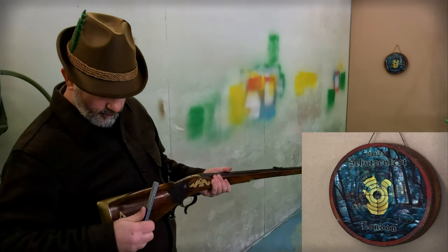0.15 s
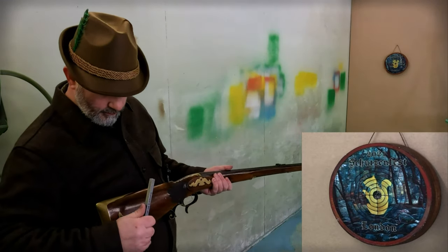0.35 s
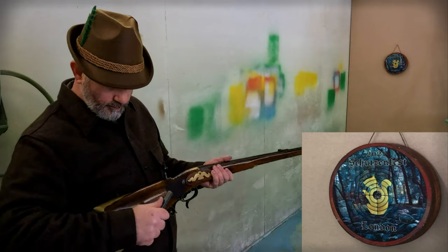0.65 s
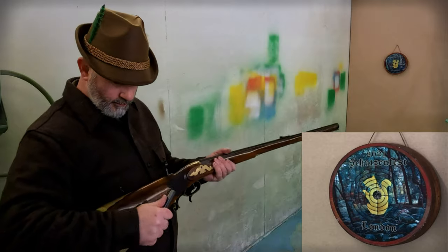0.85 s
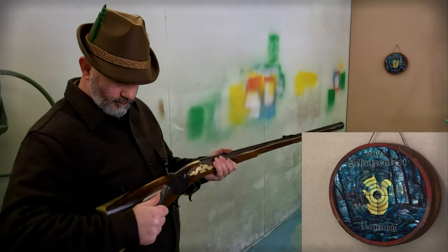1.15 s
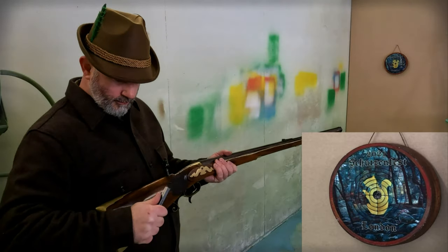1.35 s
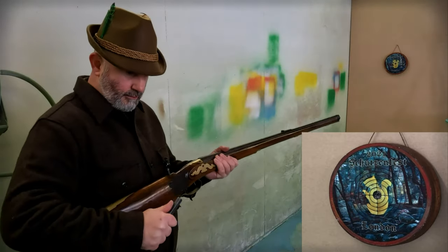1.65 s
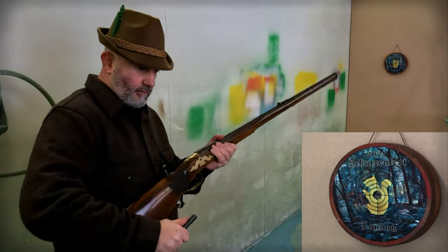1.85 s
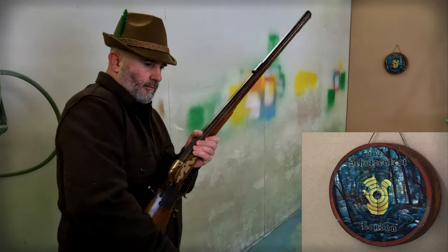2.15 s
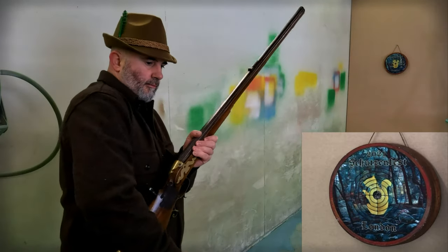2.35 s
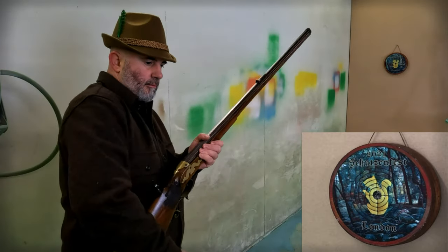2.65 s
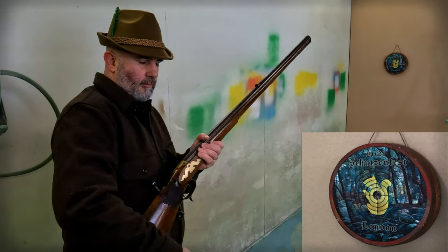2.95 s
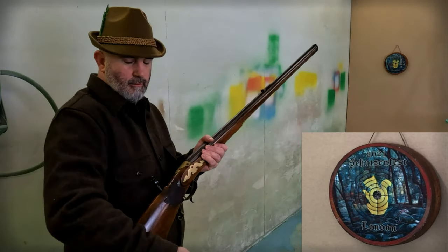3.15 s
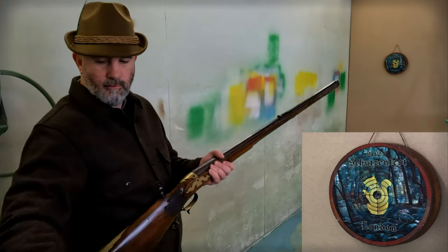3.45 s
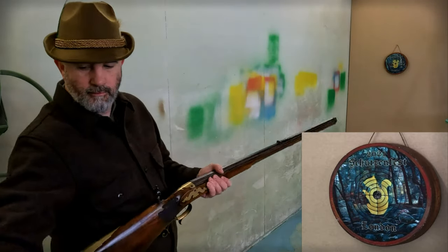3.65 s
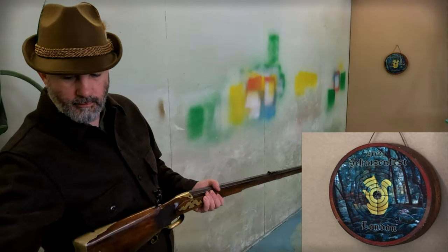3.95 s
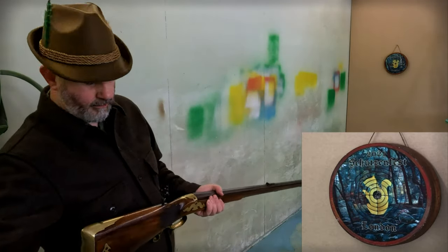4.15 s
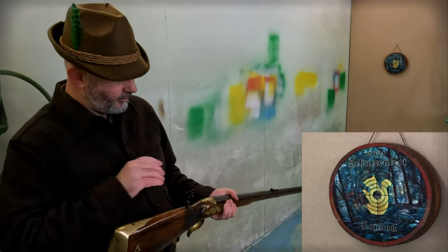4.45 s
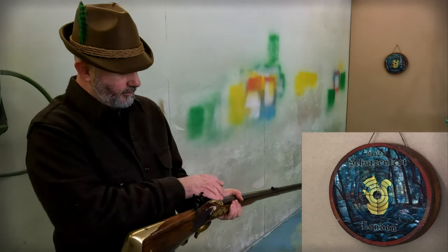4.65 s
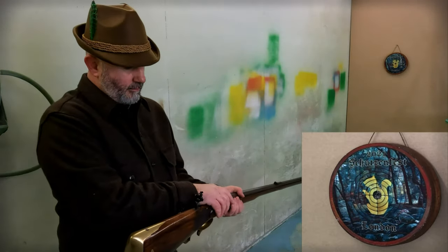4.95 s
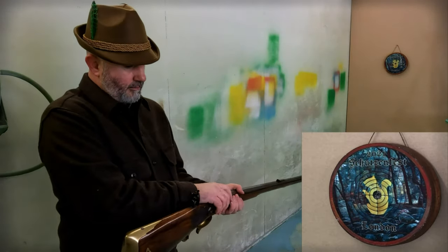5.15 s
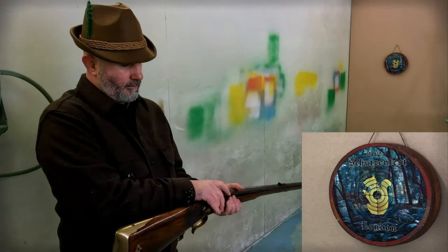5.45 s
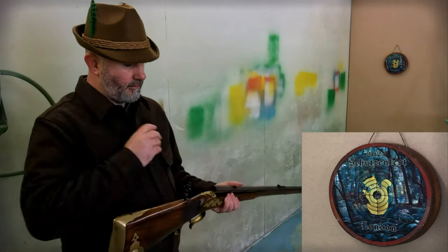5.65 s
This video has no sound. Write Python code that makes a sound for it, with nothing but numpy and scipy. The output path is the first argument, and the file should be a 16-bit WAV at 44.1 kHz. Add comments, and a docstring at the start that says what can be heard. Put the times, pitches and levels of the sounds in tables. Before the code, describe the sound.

Metallic clacks and a sharp catch snap in a bare echoing room, then steel thuds and bounces on wood over faint traffic.

```python
"""In a bare, echoing room an old air rifle is cocked with a steel crank: the crank scrapes in and taps
the action, a catch snaps, and the crank is dropped on a wooden table, where it bounces, rattles and rings.
Far traffic rumbles and drones; sleeves rustle over faint room tone. Blows are sums of decaying
modes with a stereo noise tail for the room; scrapes, rustle and room tone are shaped noise; the traffic
is shaped noise and wandering sines. The camera's noise suppressor dims the quiet moments."""
import sys
import numpy as np
from scipy import signal
from scipy.fft import rfft, irfft, next_fast_len
from scipy.io import wavfile
from scipy.ndimage import uniform_filter1d, map_coordinates

SR = 44100
rng = np.random.default_rng(int(sys.argv[2]) if len(sys.argv) > 2 else 0)


def ratio_of_db(decibels):
    """Turn decibels (scalar or array-like) into linear amplitude factors; 0 dB maps to 1."""
    return 10 ** (np.asarray(decibels, float) / 20)


def inscribe(sig):
    """Save sig as 16-bit PCM at rate SR to the path in sys.argv[1].

    A 1-D sig is mono; a 2-D sig holds one channel per row.
    Samples are clipped to [-1, 1] before scaling.
    """
    pcm = np.round(np.clip(np.atleast_2d(sig).T, -1, 1) * 32767)
    wavfile.write(sys.argv[1], SR, pcm.astype(np.int16))


N = 255330  # length in samples


def unit(x):
    """Scaled to rms 1."""
    return x / np.sqrt(np.mean(x ** 2) + 1e-20)


def along(points, hz):
    """Reads (Hz, value) points on a log frequency axis."""
    f, v = np.transpose(points)
    return np.interp(np.log(hz + 1), np.log(f + 1), v)


def curves(rows):
    """One value per sample for each column after the time."""
    s, *columns = np.transpose(rows)
    return [np.interp(np.arange(N) / SR, s, column) for column in columns]


def wobble(rate):
    """A smooth random curve with rate knots a second."""
    knots = rng.standard_normal(int(N * rate / SR) + 4)
    return map_coordinates(knots, [np.arange(N) * rate / SR])


def paired(z, hz, alike):
    """Mixes two unrelated spectra into a left and right of the given likeness."""
    turn = np.arccos(np.clip(along(alike, hz), -1, 1)) / 2
    mid, side = z[0] * np.cos(turn), z[1] * np.sin(turn)
    return np.array([mid + side, mid - side])


def noise(tone, alike):
    """Stereo noise of rms 1 with the given spectrum, falling away steeply beyond both ends of it."""
    size = next_fast_len(N)
    hz = np.fft.rfftfreq(size, 1 / SR)
    below, above = (tone[0][0] * 0.7, -90), (tone[-1][0] * 1.3, -90)
    shape = ratio_of_db(along([below, *tone, above], hz))
    spectra = paired(rfft(rng.standard_normal((2, size))), hz, alike)
    return unit(irfft(spectra * shape, size)[:, :N])


def ring(modes, t, rise_cycles):
    """One blow on a part, peak 1: decaying modes swell together, each at a slightly new strength."""
    hz, db, t60 = np.transpose(modes)[:, :, None]
    strength = db + 2 * rng.standard_normal(hz.shape)
    sign = (-1) ** np.arange(len(hz))[:, None]  # neighbouring modes start in opposite phase
    swell = (1 - np.exp(-t * hz.mean() / rise_cycles)) ** 2  # timed in cycles of the mean frequency
    decay = ratio_of_db(strength - 60 * t / np.abs(t60))
    x = np.sum(sign * decay * np.sin(2 * np.pi * hz * t), axis=0) * swell
    return x / np.abs(x).max()


# How long the bare room echoes. Each row: frequency in Hz, time to fall 60 dB in seconds.
ROOM_DECAY = [(100, 0.43), (300, 0.79), (1000, 1), (2500, 0.94), (5000, 0.58), (8000, 0.49), (13000, 0.21)]
# How alike the echoes reach left and right. Each row: frequency in Hz, likeness from 0 to 1.
ECHO_LIKENESS = [(60, 1), (180, 1), (520, 0.92), (1540, 0.66), (4530, 0.55), (13400, 0.19)]


def add(out, s, blow, pan_db, wet_db):
    """Lays a blow and a fresh room tail from s seconds, each frequency dying at its own speed."""
    hz, t, z = signal.stft(rng.standard_normal((2, SR)), SR, nperseg=256)
    z = paired(z, hz[:, None], ECHO_LIKENESS) * ratio_of_db(-60 * t / along(ROOM_DECAY, hz)[:, None])
    tail = signal.istft(z, SR, nperseg=256)[1][:, :SR]
    age = np.arange(SR) / SR
    # near walls answer strongest, after a short gap
    tail *= np.clip(age / 0.0011, 0, 1) * (1 + 0.99 * np.exp(-age / 0.014))
    tail *= ratio_of_db(wet_db) / np.linalg.norm(tail[0])
    tail[:, 0] = 1  # the direct sound
    balance = ratio_of_db([[pan_db / 2], [-pan_db / 2]])  # positive leans left
    heard = signal.fftconvolve(blow[None], tail, axes=1) * balance
    start = round(s * SR)
    out[:, start:start + heard.shape[1]] += heard


def silence():
    """Stereo silence with spare time at the end for room tails."""
    return np.zeros((2, N + 2 * SR))


# Far rumble. Each row: time in seconds, level in dB before its surges.
RUMBLE_LEVEL = [(0, -64), (.45, -61.5), (.75, -55), (1.05, -60.5), (1.33, -61.5), (1.65, -61.5), (2.1, -60),
                (2.4, -62), (3.3, -67.5), (3.65, -67), (3.8, -63), (4.6, -63.5), (4.9, -74.5), (5.1, -71.5),
                (5.38, -57), (5.48, -71), (5.56, -61.5), (5.79, -50.5)]
# Engine drone. Each row: time in seconds, middle pitch in Hz, middle level in dB.
DRONE_PATH = [(0, 200, -84), (.7, 212, -93), (.88, 218, -72.5), (1.12, 218, -65.5), (1.3, 215, -98.5),
              (1.62, 207, -69), (1.8, 196, -77.5), (2.04, 190.4, -60.5), (2.3, 190, -75.5), (2.7, 187, -78),
              (3.05, 194.9, -73.5), (3.35, 195.4, -73), (3.72, 197.4, -81.5), (3.8, 195, -62),
              (4.6, 205.4, -68), (5.05, 217.1, -67.5), (5.3, 235, -77.5), (5.79, 209.7, -77)]
# Noise bands above and below the drone. Each row: time in seconds, upper level in dB, lower level in dB.
BAND_LEVELS = [(0, -90, -74.5), (.7, -93.5, -101), (1.9, -84, -80.5), (2.3, -74, -70), (2.7, -70, -92.5),
               (3.0, -77, -93), (3.7, -73, -87), (5, -78, -88), (5.3, -67.5, -71.5), (5.6, -69, -74.5),
               (5.79, -69, -62.5)]
# Spectrum of the rumble. Each row: frequency in Hz, relative density in dB per Hz.
RUMBLE_SPECTRUM = [(12, 0), (20, -3), (27, -14), (34, -14), (42, -6), (50, -10), (56, -25)]
# Spectrum of the upper band. Each row: frequency in Hz, relative density in dB per Hz.
UPPER_SPECTRUM = [(240, -11.5), (290, 2), (320, 10.5), (350, -6.5), (400, -16)]
# Spectrum of the lower band. Each row: frequency in Hz, relative density in dB per Hz.
LOWER_SPECTRUM = [(125, -17.5), (145, -2.5), (160, -2), (172, -1), (190, -20)]


def traffic():
    """A rumble with a hum on the room's lowest mode, and an unsteady engine drone between two noise bands."""
    (rumble_db,) = curves(RUMBLE_LEVEL)
    drone_hz, drone_db = curves(DRONE_PATH)
    upper_db, lower_db = curves(BAND_LEVELS)
    near_mono = [(100, 0.98)]

    hum_hz = 39.5 + 1.5 * wobble(4)
    hum = np.sqrt(2) * np.sin(2 * np.pi * np.cumsum(hum_hz) / SR)
    hum = ratio_of_db(-7.5 + 0.65 * wobble(2.1)) * hum
    rumble = ratio_of_db(-0.5) * noise(RUMBLE_SPECTRUM, near_mono) + hum
    surge_db = 0.3 * wobble(3.1)
    rumble = ratio_of_db(rumble_db + surge_db) * rumble

    unsteady_hz = drone_hz + 4 * wobble(25)
    drone = np.sqrt(2) * np.sin(2 * np.pi * np.cumsum(unsteady_hz) / SR)
    drone = ratio_of_db(drone_db + 4 * wobble(25)) * drone

    upper = ratio_of_db(upper_db) * noise(UPPER_SPECTRUM, near_mono)
    lower = ratio_of_db(lower_db) * noise(LOWER_SPECTRUM, near_mono)
    return rumble + drone + upper + lower


# Sleeve and hand strokes. Each row: middle in seconds, length in seconds, rub in dB, hiss in dB.
RUSTLE_STROKES = [(0, 0.13, -67.5, -104), (1.136, .2, -73, -94), (2.002, 0.4, -79, -93.5),
                  (3.72, 0.63, -78, -92.5), (5.321, 0.26, -76.5, -88), (5.622, .15, -81, -87.5),
                  (5.79, 0.19, -70.5, -88)]
# Spectrum of hands on the stock. Each row: frequency in Hz, relative density in dB per Hz.
RUB_SPECTRUM = [(500, -12.5), (800, -16.5), (1100, -10), (1400, -5), (1900, -15.5), (2600, -23),
                (4000, -27)]
# Spectrum of cloth on cloth. Each row: frequency in Hz, relative density in dB per Hz.
HISS_SPECTRUM = [(2500, -44), (4200, -7.5), (5500, -1.5), (7000, -7.5), (8500, -13), (12000, -27.5)]
# Left-right likeness of rustle, room tone and scrape noise. Each row: frequency in Hz, likeness from 0 to 1.
LIKENESS = [(60, 1), (180, 0.86), (520, 1), (1540, 0.27), (4530, 0.14), (13400, 0.12)]


def rustle():
    """Hands rub the stock and cloth brushes cloth; each stroke swells and fades over a faint steady rustle."""
    middle, length, rub_db, hiss_db = np.transpose(RUSTLE_STROKES)[:, :, None]
    swell = np.exp(-(2 * (np.arange(N) / SR - middle) / length) ** 2)
    # the first term of each is the faint rustle between strokes
    rub = ratio_of_db(-81.5) + np.sum(ratio_of_db(rub_db) * swell, axis=0)
    hiss = ratio_of_db(-87) + np.sum(ratio_of_db(hiss_db) * swell, axis=0)
    rub = rub * ratio_of_db(1.5 * wobble(12))
    hiss = hiss * ratio_of_db(0.85 * wobble(6))
    return rub * noise(RUB_SPECTRUM, LIKENESS) + hiss * noise(HISS_SPECTRUM, LIKENESS)


# Spectrum of the room tone. Each row: frequency in Hz, relative density in dB per Hz.
AIR_SPECTRUM = [(36, -36.5), (62, -8), (87, -7), (119, -11.5), (192, -9.5), (387, -16), (623, -22.5),
                (1200, -27), (2830, -36), (4160, -42.5), (6110, -35), (8200, -45), (13800, -46)]


def room_tone():
    """The room at rest: steady shaped noise, widest in the treble."""
    return ratio_of_db(-71.5) * noise(AIR_SPECTRUM, LIKENESS)


# The crank slides on metal up to a contact. Each row: start in seconds, end in seconds,
# level at the start in dB, level at the end in dB, both before the grit.
CRANK_SCRAPES = [(0.096, 0.185, -59, -62.5), (0.744, 0.77, -77, -70), (2.205, 2.273, -73.5, -65.5),
                 (3.109, 3.125, -82.5, -60.5), (3.716, 3.785, -81, -77), (4.049, 4.078, -71.5, -60)]
# Spectrum of a scrape. Each row: frequency in Hz, relative density in dB per Hz.
SCRAPE_SPECTRUM = [(550, -13), (750, 1.5), (1100, -5), (1600, 2), (1950, -12), (2200, -25), (3600, -31.5)]


def scrapes():
    """The crank slides on metal: shaped noise with a gritty, fast random level."""
    out = silence()
    for start, end, start_db, end_db in CRANK_SCRAPES:
        count = round((end - start) * SR)
        grit = noise(SCRAPE_SPECTRUM, LIKENESS)[0, :count] * ratio_of_db(2.5 * wobble(180)[:count])
        slide = grit * ratio_of_db(np.linspace(start_db, end_db, count))
        add(out, start, slide, pan_db=0.9, wet_db=-2.0)
    return out[:, :N]


# Light touches that leave the barrel ringing. Each row: start in seconds, peak of the middle modes in dB
# before the grip, low modes in dB over it, high modes in dB over it, 60 dB decay the grip adds in seconds.
BARREL_TOUCHES = [(0.0964, -58.5, 7, -18, 0.014), (1.0727, -59, 5.5, -3, 0.077),
                  (1.1427, -66, 13, -21, .08), (1.5981, -65.5, 9.5, 4.5, 0.033),
                  (1.8922, -61.5, -3.5, -11.5, 0.027), (1.9585, -61, 4.5, -20, 0.29),
                  (2.0438, -68, 2, -15, .1), (2.0719, -70.5, 12.5, 5, 0.11),
                  (2.1874, -56.5, 3.5, -1.5, 0.031), (3.034, -70, 10.5, -6, .02),
                  (3.5094, -64, 2.5, 3.5, 0.062), (3.682, -59, 0.5, -1, 0.064),
                  (5.2514, -49, -2, -4.5, 0.018), (5.3924, -46.5, -1.5, -7.5, 0.024),
                  (5.566, -60.5, -3, 1, .02), (5.6797, -57, -1, -11, 0.038), (5.7424, -58, -8, -14, .03)]
# Middle, low and high modes of the barrel, a list of each.
# Each row: frequency in Hz, relative level in dB, time to fall 60 dB in seconds.
BARREL_MODES = [
    [(1820, -2, 0.096), (1945, 4, 0.023), (2210, -3.5, 0.027), (2500, -1.5, 0.027)],
    [(990, -5, .05), (1150, -5.5, 0.025), (1348, -3, 0.11)],
    [(3040, -3, 0.016), (3800, 0, 0.01), (4600, -3.5, 0.014), (5144, -0.5, 0.0039), (6005, -4, 0.016),
     (6960, -1.5, 0.0056)],
]


def touches():
    """A touched barrel rings in three groups of modes, which the gripping hand damps."""
    out, t = silence(), np.arange(SR // 10) / SR
    for s, db, *shares, grip_t60 in BARREL_TOUCHES:
        groups = zip(BARREL_MODES, [0, *shares])
        blow = sum(ratio_of_db(db + share) * ring(modes, t, rise_cycles=1.5) for modes, share in groups)
        grip = ratio_of_db(-60 * t / abs(grip_t60))
        add(out, s, blow * grip, pan_db=1.1, wet_db=1.5)
    return out[:, :N]


# Hard contacts on the rifle. Each row: start in seconds, peak of the action in dB,
# then stock, plate and spring in dB over it.
HARD_CONTACTS = [(0.154, -59, -17, -10, -2), (0.162, -44.5, -15, -2.5, -3), (0.172, -37.5, -5.5, -7, -9),
                 (0.175, -35, -1.5, -4, -5.5), (0.1825, -40.5, -4, -28, 1.5), (0.7729, -42, -3, -19, -4),
                 (0.7797, -42.5, -2.5, -25, -11), (0.7931, -50.5, 2, -5, 7),
                 (0.7962, -47.5, -5.5, -12, 4.5), (0.8015, -51, 6.5, -0.5, -9), (2.2776, -31, -12, -10, 2),
                 (2.2818, -38.5, 2.5, -15, 15), (2.286, -37, -11.5, -20, 3),
                 (2.3194, -41, -1, -23.5, -18.5), (2.4795, -49.5, 0, -18, -1),
                 (3.133, -34.5, -0.5, -23, -21.5), (3.1369, -37.5, -4, -6, -16),
                 (3.1418, -49.5, -24, -22, -26)]
# Modes of the action. Each row: frequency in Hz, relative level in dB, time to fall 60 dB in seconds.
ACTION_MODES = [(1395, 8.5, 0.0069), (1610, -1.5, 0.024), (1770, -3.5, 0.022), (1978, -5.5, 0.032),
                (2220, -3, 0.019), (2356, 2.5, 0.0096)]
# Modes of the stock. Each row: frequency in Hz, relative level in dB, time to fall 60 dB in seconds.
STOCK_MODES = [(679, -4.5, 0.049), (810, 0.5, 0.0088), (966, -0.5, 0.028), (1168, 6.5, 0.015)]
# Modes of the plate. Each row: frequency in Hz, relative level in dB, time to fall 60 dB in seconds.
PLATE_MODES = [(3110, 1.5, 0.0091), (3500, -3, 0.013), (3735, -4, 0.012)]
# Modes of the spring. Each row: frequency in Hz, relative level in dB, time to fall 60 dB in seconds.
SPRING_MODES = [(2615, -1, 0.0055), (4310, 1, 0.0038), (4960, -7, 0.0089), (5300, -10.5, 0.012),
                (5680, -7, 0.0067), (6570, 6, 0.0015), (7460, -10, 0.0027)]


def contacts():
    """Each hard contact shakes the parts of the rifle in its own share."""
    out, t = silence(), np.arange(SR // 10) / SR
    for s, db, *shares in HARD_CONTACTS:
        parts = zip([ACTION_MODES, STOCK_MODES, PLATE_MODES, SPRING_MODES], [0, *shares])
        blow = sum(ratio_of_db(db + share) * ring(modes, t, rise_cycles=0.89) for modes, share in parts)
        add(out, s, blow, pan_db=1.3, wet_db=-2.5)
    return out[:, :N]


# A pin snaps over. Each row: start in seconds, peak of the pin in dB.
PIN_SNAPS = [(0.172, -67), (0.2902, -60.5), (2.2775, -33.5), (2.2835, -60), (2.3194, -72)]
# Modes of the pin. Each row: frequency in Hz, relative level in dB, time to fall 60 dB in seconds.
PIN_MODES = [(8450, -7.5, 0.0018), (9830, -9.5, 0.0049), (10790, -4, 0.003), (12000, -17.5, 0.0011)]


def snaps():
    """A snapping pin rings high and shakes the spring, which sounds louder than the pin."""
    out, t = silence(), np.arange(SR // 10) / SR
    for s, db in PIN_SNAPS:
        pin = ring(PIN_MODES, t, rise_cycles=0.89)
        spring = ratio_of_db(6.5) * ring(SPRING_MODES, t, rise_cycles=0.89)
        add(out, s, ratio_of_db(db) * (pin + spring), pan_db=4.0, wet_db=-2.0)
    return out[:, :N]


# Dull knocks on the butt. Each row: start in seconds, peak in dB.
BUTT_KNOCKS = [(.178, -42), (.185, -65), (1.08, -57), (1.15, -60), (2.061, -63), (2.318, -55.5),
               (3.135, -53.5), (5.252, -66)]
# Modes of the butt. Each row: frequency in Hz, relative level in dB, time to fall 60 dB in seconds.
BUTT_MODES = [(374, -10, 0.059), (479.5, -0.5, 0.02), (550, 1.5, 0.04)]


def knocks():
    """The butt answers each knock with a few low modes."""
    out, t = silence(), np.arange(SR // 10) / SR
    for s, db in BUTT_KNOCKS:
        add(out, s, ratio_of_db(db) * ring(BUTT_MODES, t, rise_cycles=0.87), pan_db=2.0, wet_db=-2.5)
    return out[:, :N]


# A small catch slips. Each row: start in seconds, peak in dB.
CATCH_TICKS = [(3.681, -72), (3.688, -74), (3.725, -69.5), (3.7325, -62.5), (3.747, -50), (3.762, -64),
               (3.7752, -44), (3.79, -69.5), (3.811, -64.5), (3.825, -59.5), (3.946, -70.5)]
# Modes of the catch. Each row: frequency in Hz, relative level in dB, time to fall 60 dB in seconds.
CATCH_MODES = [(3100, -0.5, 0.0029), (3720, -1, 0.0041), (4800, -8, .004), (6140, -2, 0.0038),
               (7100, -1.5, 0.0059), (8270, -11, 0.0033), (10490, 0.5, .004), (12400, -11.5, .003),
               (13600, -8.5, 0.0033)]


def catch_ticks():
    """The slipping catch ticks: small, high modes that die within milliseconds."""
    out, t = silence(), np.arange(SR // 10) / SR
    for s, db in CATCH_TICKS:
        add(out, s, ratio_of_db(db) * ring(CATCH_MODES, t, rise_cycles=2.4), pan_db=4.5, wet_db=2.5)
    return out[:, :N]


# The crank lands on the table. Each row: start in seconds, peak of the table top's ring in dB,
# boom in dB over it, edge in dB over it, clink in dB over it.
CRANK_DROPS = [(4.071, -23.5, -9, -3.5, -9.5), (4.2113, -23, -7.5, 5, -9), (4.2390, -19, -8.5, 1.5, -1),
               (4.247, -33, -5, 2.5, -12), (4.261, -28.5, -18, -1.5, -12), (4.278, -36.5, -17, 3.5, -11)]
# Modes of the table top. Each row: frequency in Hz, relative level in dB, time to fall 60 dB in seconds.
TABLE_MODES = [(310, -3.5, 0.022), (405.4, -3.5, .03), (614, -1, 0.011), (738, 3, 0.015)]
# Modes of the table's edge. Each row: frequency in Hz, relative level in dB, time to fall 60 dB in seconds.
EDGE_MODES = [(828, -3.5, 0.012), (1081, -6.5, 0.028), (1155, 3.5, 0.0083), (1242, 3.5, 0.0048),
              (1579, -0.5, 0.012), (1785, -11.5, 0.009), (2017, -4.5, 0.0095)]
# Steel first meeting wood. Each row: frequency in Hz, relative level in dB, time to fall 60 dB in seconds.
THUMP_MODES = [(787, 3.5, 0.0037), (1500, -5.5, 0.0027)]
# Boom of the table's body. Each row: frequency in Hz, relative level in dB, time to fall 60 dB in seconds.
BOOM_MODES = [(51, -4, 0.13), (97.5, -3, 0.32), (146, 1.5, 0.065), (239.6, 1, 0.068), (300.6, 0.5, 0.045)]
# Clink of the crank. Each row: frequency in Hz, relative level in dB, time to fall 60 dB in seconds.
CLINK_MODES = [(1707, 2.5, 0.0064), (2250, -7.5, .01), (2710, 5, 0.0027), (3197, -7.5, 0.0087),
               (3420, -7.5, 0.0069), (4330, -8, 0.0021), (5810, -17.5, 0.0035), (6975, -30, 0.0021)]


def drops():
    """Blunt blows ring the table's top, edge and body, and the steel clinks."""
    out, t = silence(), np.arange(SR // 2) / SR
    for s, db, boom_db, edge_db, clink_db in CRANK_DROPS:
        top = ring(TABLE_MODES, t, rise_cycles=0.15)
        edge = ratio_of_db(edge_db) * ring(EDGE_MODES, t, rise_cycles=1.0)
        thump = ratio_of_db(6) * ring(THUMP_MODES, t, rise_cycles=0.35)
        clink = ratio_of_db(clink_db) * ring(CLINK_MODES, t, rise_cycles=0.52)
        boom = ratio_of_db(db + boom_db) * ring(BOOM_MODES, t, rise_cycles=0.77)
        add(out, s, boom, pan_db=-0.6, wet_db=1.5)
        add(out, s, ratio_of_db(db) * (top + edge + thump + clink), pan_db=1.5, wet_db=1.63)
    return out[:, :N]


# The crank's steel. Each row: frequency in Hz, relative level in dB, time to fall 60 dB in seconds.
SHANK_MODES = [(380, -0.5, 3), (1600, 1, 1.5), (2212, -2, 1.9)]


def shank():
    """The hardest bounce leaves the crank's steel ringing faintly for a long while."""
    out = np.zeros(N + 2 * SR)
    s, db, *_ = max(CRANK_DROPS, key=lambda drop: drop[1])
    steel = ring(SHANK_MODES, np.arange(2 * SR) / SR, rise_cycles=3.5)
    out[round(s * SR):][:2 * SR] = ratio_of_db(db - 30) * steel
    return out[:N] * ratio_of_db(3.5 * wobble(9))  # its faint ring wavers in level


# The loose crank rocks to rest. Each row: time in seconds, level in dB.
RATTLE_LEVEL = [(4.24, -47), (4.263, -48), (4.3, -42.5), (4.326, -48.5), (4.37, -57)]


def rattle():
    """The rocking crank rattles: dense random ticks, each ringing its clink."""
    out = silence()
    s, db = np.transpose(RATTLE_LEVEL)
    during = np.arange(s[0], s[-1], 1 / SR)
    struck = rng.random(len(during)) < 0.03
    ticks = unit(rng.standard_normal(len(during)) * struck)
    clink = ring(CLINK_MODES, np.arange(SR // 20) / SR, rise_cycles=0.57)
    level = ratio_of_db(np.interp(during, s, db))
    chatter = signal.fftconvolve(ticks * level, clink / np.linalg.norm(clink))
    add(out, s[0], chatter, pan_db=1.0, wet_db=5.5)
    return out[:, :N]


def scene():
    """Everything heard in the room."""
    background = traffic() + rustle() + room_tone()
    rifle = scrapes() + touches() + contacts() + snaps() + knocks() + catch_ticks()
    crank = drops() + shank() + rattle()
    return background + rifle + crank


def suppress(x):
    """The camera's noise suppressor turns each band down as it sinks toward its usual background level."""
    depth_db, knee_db = 6, 11  # deepest cut; height over the usual level where it lets go
    hz, _, z = signal.stft(x, SR, nperseg=1024)
    power = np.mean(np.abs(z) ** 2, axis=0)
    power = uniform_filter1d(power, size=25, axis=0)  # smooth over frequency
    power = uniform_filter1d(power, size=3, axis=1)  # then over time
    usual = np.median(power, axis=1, keepdims=True)
    over_db = 10 * np.log10(np.abs(power) / usual + 1e-9)
    reach = np.clip(hz / 620 - 0.5, 0, 1)[:, None]  # none below 310 Hz, full from 930 Hz
    shut = np.clip(1 - over_db / knee_db, 0, 1) * reach
    return signal.istft(z * ratio_of_db(-depth_db * shut), SR, nperseg=1024)[1][:, :N]


def roll_off(x):
    """The treble ends steeply here."""
    return signal.sosfilt(signal.butter(12, 13950, fs=SR, output="sos"), x)


def record(dry):
    """The room as the camera keeps it, its quiet moments dimmed by the noise suppressor."""
    mix = suppress(dry)
    return roll_off(mix)


dry = scene()
out = record(dry)
inscribe(out)
```